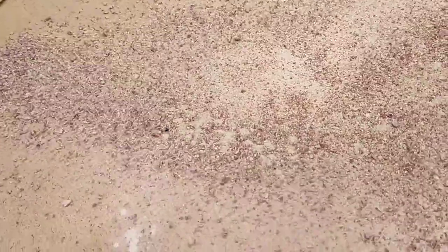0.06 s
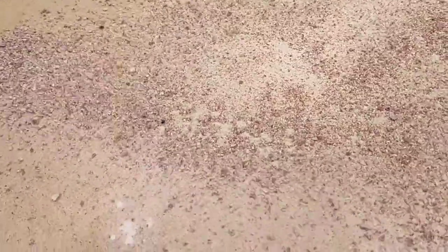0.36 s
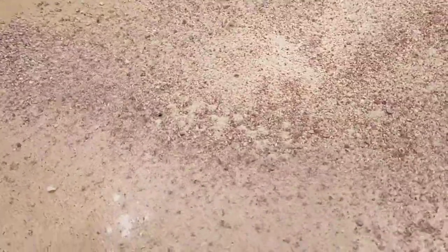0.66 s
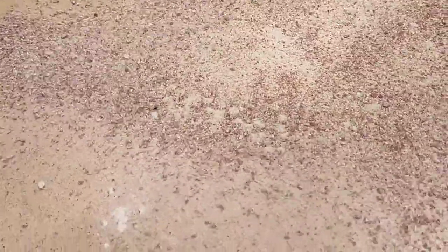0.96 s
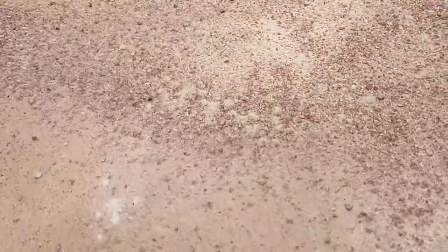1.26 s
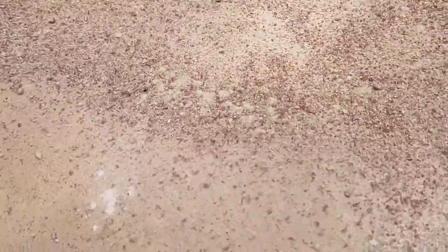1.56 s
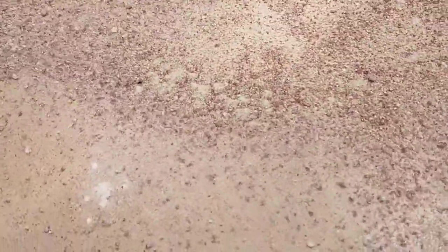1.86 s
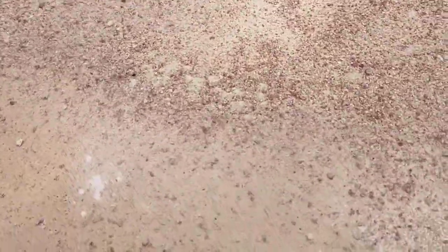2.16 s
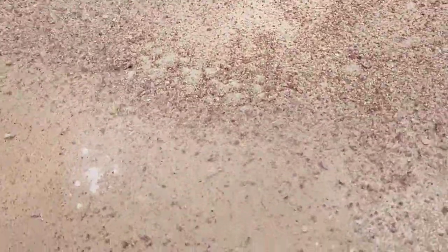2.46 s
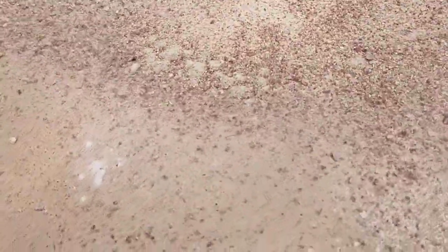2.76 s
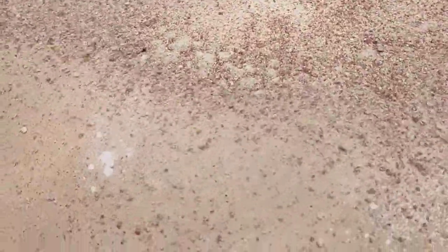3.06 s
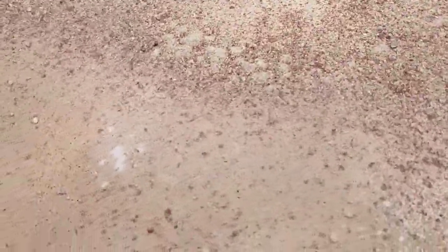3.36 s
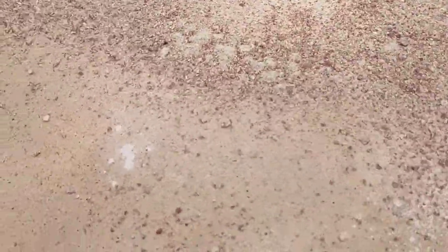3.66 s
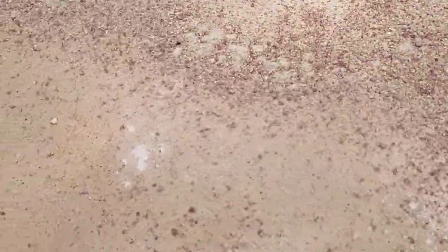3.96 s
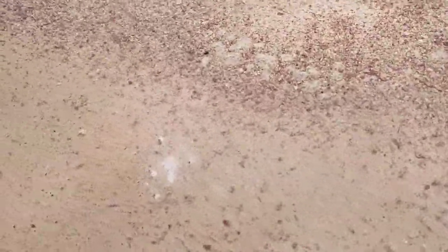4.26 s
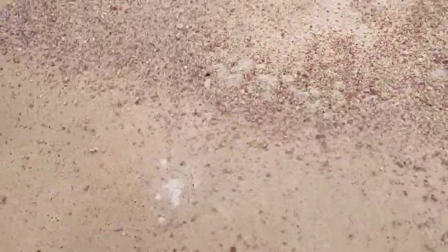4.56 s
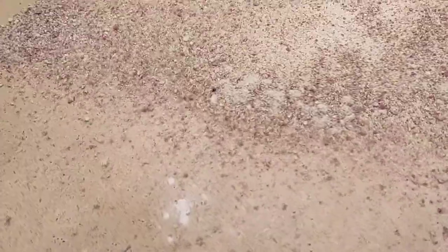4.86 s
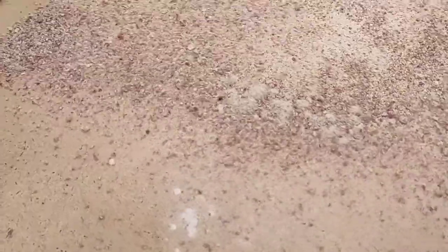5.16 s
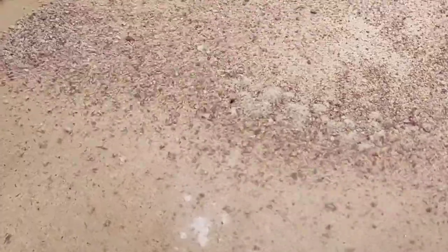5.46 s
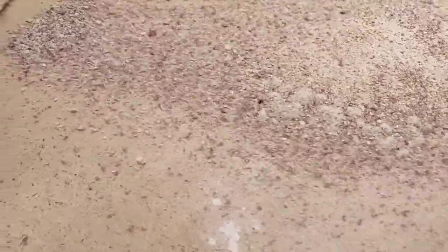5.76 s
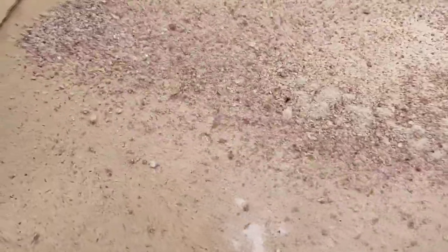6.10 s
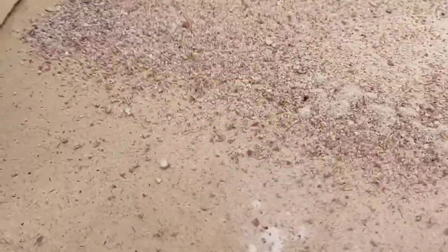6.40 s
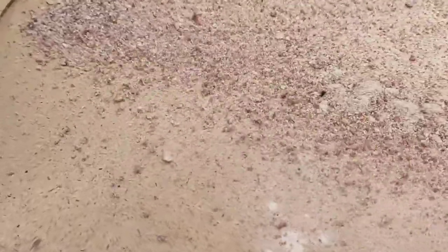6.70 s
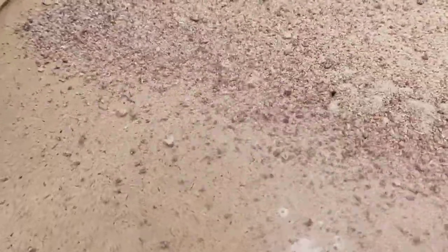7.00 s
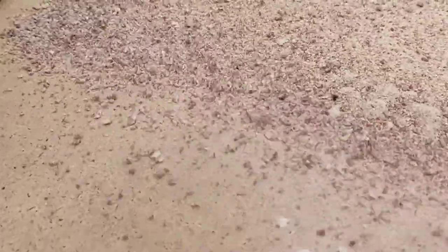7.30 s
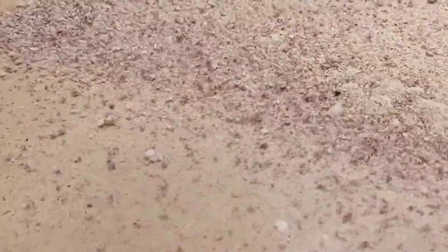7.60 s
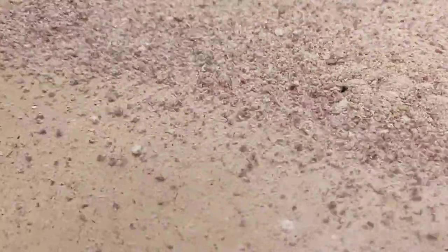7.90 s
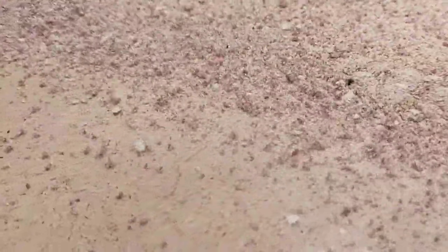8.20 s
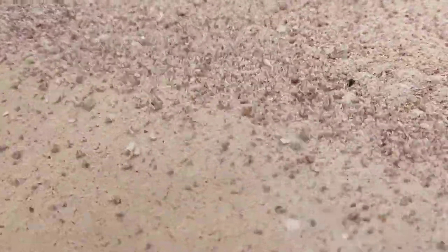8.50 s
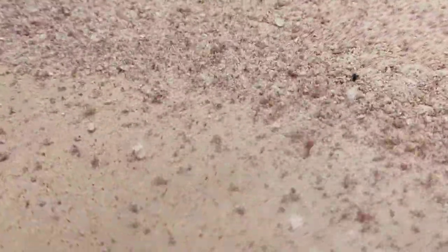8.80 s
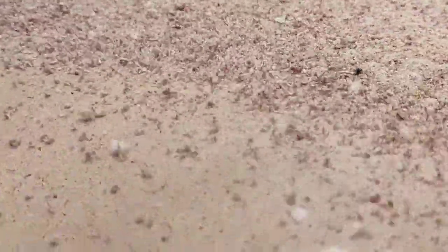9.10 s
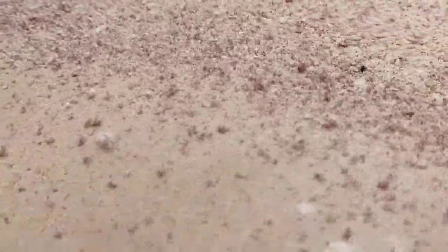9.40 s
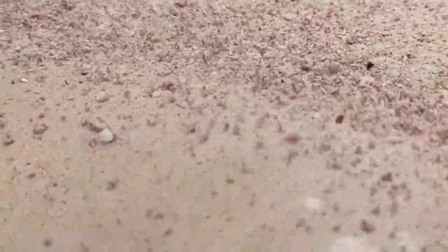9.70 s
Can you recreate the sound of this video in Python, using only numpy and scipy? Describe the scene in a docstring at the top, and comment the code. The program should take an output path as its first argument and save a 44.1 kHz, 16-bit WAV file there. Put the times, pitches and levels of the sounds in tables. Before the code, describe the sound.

An electric shaker hums steadily under a tray, which throbs and rattles while sand hisses and crackles on it, growing gradually closer.

```python
"""A mains-driven shaker hums under a tray of sand, indoors and close to the microphone.
It pushes the tray 100 times a second while the tray rocks at about 43 Hz, so hum, rattle and knocks
throb in a near-repeating pattern that stumbles for the first second, then settles. Sand is thrown up
and lands on every stroke, and coarse grains crackle at each blow, over a dull rustle.
Mostly in the second half, the microphone moves nearer and comes over coarser sand."""
import sys
import numpy as np
from scipy import signal
from scipy.fft import rfft, irfft
from scipy.io import wavfile

SR = 44100
rng = np.random.default_rng(int(sys.argv[2]) if len(sys.argv) > 2 else 0)


def generate_wav(signal):
    """Clip the signal to [-1, 1] and save it as 16-bit WAV at the path in sys.argv[1]."""
    frames = np.transpose(np.atleast_2d(signal))
    scaled = np.clip(frames, -1, 1) * 32767
    pcm = np.round(scaled).astype(np.int16)
    wavfile.write(sys.argv[1], SR, pcm)


N = 434385
TIME = np.arange(N) / SR
STROKE_HZ, STROKE_START = 99.996, .367  # the shaker's push; start in cycles
ROCK_HZ, ROCK_START = 42.605, -.25  # the tray's settled rocking; start in cycles

# The rocking, a little faster during the stumble. Each row: time in seconds, rate in Hz.
ROCK_RATE = [(0, 43.25), (.5, 43.45), (1.1, 43), (1.45, 42.61), (3, 42.6), (4.3, 42.545), (5.3, 42.605),
             (6.8, 42.625), (9.85, 42.6)]
# The hum, one row per stroke harmonic from the first up.
# Each row: base levels in dB of the lines -4 to 4 rocking rates away from that harmonic.
HUM_LEVELS = [(-82, -69, -70, -60, -15.2, -62, -53, -63, -72),
              (-74, -66, -62, -44.5, -27.9, -41.3, -44.5, -51, -50),
              (-67, -61, -47, -41, -28.4, -30.5, -37.5, -52, -51),
              (-71, -65, -39, -30.5, -47.5, -47, -43, -45, -55),
              (-60, -51, -48, -38.3, -35.8, -43.5, -53, -56, -53.5),
              (-67, -50, -41.5, -40.3, -50, -41.3, -48.5, -59, -60),
              (-59, -53.5, -47, -43.8, -51, -61, -62, -64, -60)]
# What hum and rattle gain as the microphone moves in. Each row: frequency in Hz, gain in dB.
CLOSE_UP_EQ = [(100, 3.5), (200, 5), (290, 2), (340, 2.5), (460, 7.5), (650, 4.5), (850, 6), (1010, 8),
               (1120, 4), (1400, 0.5)]
# How stumbling reshapes the hum. Each row: frequency in Hz, gain in dB.
STUMBLE_EQ = [(100, 0.5), (200, -2), (300, 2.5), (340, 0), (360, -13), (390, 0), (455, -9), (500, -0.5),
              (640, -18.5)]
# The rattle, one row per stroke harmonic above those of the hum.
# Each row: base levels in dB of the lines -5 to 5 rocking rates away from that harmonic.
RATTLE_LEVELS = [(-68, -55, -54, -57, -56, -61, -54, -59, -63, -65, -66),
                 (-70, -62, -59, -58, -53, -61, -65, -63, -67, -63, -59),
                 (-65, -62, -59, -63, -59, -65, -60, -68, -64, -64, -65),
                 (-65, -64, -70, -54, -61, -63, -64, -66, -68, -68, -67),
                 (-63, -70, -65, -60, -66, -64, -65, -68, -71, -74, -75),
                 (-63, -61, -70, -60, -69, -63, -70, -72, -73, -74, -67),
                 (-68, -68, -67, -70, -71, -75, -69, -74, -69, -74, -77)]
# Where the tray hits its support. Each row: tilt of the hardest blow and reach around it, both in
# rocking cycles, place in the stroke in cycles, drift in strokes per rock, strength in dB.
TRAY_CONTACTS = [(.23, .14, .79, .15, 5), (.93, .2, .70, .2, 0), (.5, .1, .65, -.5, 3.5),
                 (.71, .13, .69, .1, 2), (.65, .15, .86, .1, 2), (.8, .14, 1.08, 0, 0)]
# Tone of the tray's ring and thud, the grains' crackle, the two sands and the background rustle.
# Each row: frequency in Hz, relative level in dB.
KNOCK_EQ = [(250, 36), (480, -54), (640, 20), (800, 25), (1000, 11), (1150, 26.5), (1330, -8.5), (1500, 2),
            (1750, -15), (2400, -13), (3800, -43)]
THUD_EQ = [(110, -38.5), (180, -13), (260, -17.5), (330, 1), (385, -1), (430, -18), (510, -10),
           (620, -15.5), (800, -28), (1100, -42), (1600, -86)]
CRACKLE_EQ = [(1400, -4), (1750, -1.5), (2200, 1.5), (3000, -4), (4200, -9.5), (6000, -2.5), (8000, 1),
              (10000, -23)]
FINE_SAND_EQ = [(820, 10), (1400, -1.5), (1760, -3.5), (1900, 1), (2320, -3), (2640, -3), (3350, -11),
                (3700, -7), (4510, -11), (6520, 0), (8190, 5.5), (8870, 2), (10200, -11), (14400, -15.5),
                (15000, -23)]
COARSE_SAND_EQ = [(820, -10), (1400, -2), (1520, 5.5), (1760, 0.5), (2170, 5.5), (3970, -8.5), (6710, 1.5),
                  (8440, 5), (8950, 2.5), (9890, -9.5), (11900, -9), (14400, -13), (15000, -20)]
RUSTLE_EQ = [(15, 4), (45, 1), (120, 2.5), (220, -1), (340, 1), (500, -2), (700, -8), (1100, -13),
             (1600, -22), (3000, -40)]
# Balance of the two microphone ports. Each row: frequency in Hz, left minus right in dB.
PORT_BALANCE = [(60, -4), (80, 3.5), (110, 6.5), (140, 0), (190, 1), (260, 9), (340, 3), (440, 4),
                (540, 3.5), (640, -1), (820, 0), (1100, 0), (1470, -2), (1960, -4), (2620, 0.5), (3510, 1),
                (4690, 1), (6270, -1.5), (8380, 8.5), (11200, 11.5), (15000, -3.5)]
# Phase between the ports. Each row: frequency in Hz, lead of the left port in radians.
PORT_PHASE = [(280, 0), (600, -.55), (1100, -.7), (2000, 0)]


def hum(stroke, rock, stumble, near, side_stumble_db=2.5):
    """The shaker drones on harmonics of its stroke; the rocking splits each into side lines."""
    nearer = near - near.mean()
    side_lift = gain_of(side_stumble_db * stumble)
    sides = {m: phasor(m * rock) * (side_lift if m else 1) for m in range(-4, 5)}
    out = np.zeros(N)
    for harmonic, levels in enumerate(HUM_LEVELS, 1):
        push = phasor(harmonic * stroke)
        for (m, side), db in zip(sides.items(), levels):
            hz = abs(harmonic * STROKE_HZ + m * ROCK_HZ)
            # harmonics share one delay; side lines follow the tilt and flip below the main resonance
            phase = .3 + .79 * m + .4 * (m > 1) + .5 * (hz < 292) if m else .25 - .35 * harmonic
            level = gain_of(db + curve_at(CLOSE_UP_EQ, hz) * nearer + curve_at(STUMBLE_EQ, hz) * stumble)
            out += np.sqrt(2) * level * (push * side * phasor(phase)).real
    return out


def rattle(stroke, rock, near, swell_hz=1015, swell_width_hz=55, spread_cycles=.11):
    """The tray's pitched rattle pulses with the rocking; up close, one resonance slowly swells."""
    sides = {m: phasor(m * (rock - .05) + m * m / 11) for m in range(-5, 6)}
    nearer = near - near.mean()
    # seven times the rocking rate nearly meets the stroke's third harmonic: a slow beat
    swell_db = 4 * near ** .3 * (np.cos(2 * np.pi * (3 * stroke - 7 * rock - .08)) - .1)
    loose_stroke = stroke - .89 + .0015 * waver(25)  # late in the stroke, with a little slop
    out = np.zeros((2, N))
    for harmonic, levels in enumerate(RATTLE_LEVELS, len(HUM_LEVELS) + 1):
        push = phasor(harmonic * loose_stroke)
        for (m, side), db in zip(sides.items(), levels):
            hz = harmonic * STROKE_HZ + m * ROCK_HZ
            resonance = np.exp(-((hz - swell_hz) / swell_width_hz) ** 2)
            level = gain_of(db + curve_at(CLOSE_UP_EQ, hz) * nearer + resonance * swell_db)
            ear_angle = phasor(spread_cycles * rng.standard_normal())
            smear = phasor(spread_cycles * rng.standard_normal())  # the tray's modes smear the blows
            line = push * side * level * smear
            out += (line * ear_angle).real, (line / ear_angle).real
    flutter_db = .15 + .07 * waver(51)
    return np.sqrt(2) * out * gain_of(flutter_db)


def blows(rock, stumble, jitter_ms=.039, stumble_ms=.4, chance_db=2):
    """The tray strikes its support each stroke; the tilt decides which edge hits, when and how hard."""
    strikes = np.zeros(N)
    for hardest, reach, place, drift, db in TRAY_CONTACTS:
        at = stroke_times(place)
        tilt = (np.interp(at, TIME, rock) - hardest + .5) % 1 - .5
        slop_ms = jitter_ms + stumble_ms * np.interp(at, TIME, stumble)
        late, hard = rng.uniform(-.65, 1, (len(at), 2)).T
        at = at + drift * tilt / STROKE_HZ + slop_ms * late / 1000
        force = gain_of(db + chance_db * hard) * np.exp(-(tilt / reach) ** 2)
        strikes += clicks(at, force * (at < TIME[-1]))
    return strikes


def knocks(strikes, stumble, level_db, thud_db=-27.5):
    """The blows ring the tray; while it stumbles, uneven blows make its whole body thud."""
    ring = reflections(colour(strikes, KNOCK_EQ), t60_s=.44, wet_db=-6)
    at = stroke_times(.92)[:-1]
    thuds = colour(clicks(at, rng.choice([-1, 1], len(at))), THUD_EQ)
    return gain_of(level_db) * unit_rms(ring) + gain_of(thud_db) * stumble * unit_rms(thuds)


def sand(stroke, rock, coarseness, level_db, grains_per_s=12000, size_spread_db=3, bunching_db=2):
    """Grains land in a hissing shower on each stroke; a few are larger than the rest."""
    landing = 2 * np.pi * (stroke - .78)
    shower_db = bunching_db * (np.cos(landing) + .53 * np.cos(2 * landing + 1.7))
    # the throw is strongest when stroke and rocking line up
    shower_db += .23 * np.cos(landing - 2 * np.pi * rock) + .5 * np.cos(landing - 4 * np.pi * rock)
    shower_db += .78 * waver(60)
    lands = rng.random((2, N)) < grains_per_s / SR
    size = gain_of(size_spread_db * np.minimum(rng.exponential(1, (2, N)), 6))
    grains = lands * size * rng.choice([-1, 1], (2, N)) * gain_of(shower_db)
    room_wash = gain_of(-1) * rng.standard_normal((2, N))
    grains = unit_rms(grains) + room_wash
    fine = unit_rms(colour(grains, FINE_SAND_EQ))
    coarse = unit_rms(colour(grains * rng.choice([-1, 1], (2, N)), COARSE_SAND_EQ))
    hiss = np.sqrt(1 - coarseness) * fine + np.sqrt(coarseness) * coarse
    return gain_of(level_db) * unit_rms(hiss)


def grain_crackle(strikes, level_db, decay_s=.0012):
    """Each blow jolts the coarse grains, which answer with a very short crackle."""
    bursts = signal.lfilter([1], [1, -np.exp(-1 / (decay_s * SR))], strikes)
    crackle = colour(bursts * rng.standard_normal((2, N)), CRACKLE_EQ)
    return gain_of(level_db) * unit_rms(reflections(crackle, t60_s=.19, wet_db=-5))


def bed_rustle(level_db):
    """The shaken bed of sand and the room lay a dull rustle under everything."""
    noise = rng.standard_normal(N) + rng.standard_normal((2, N))  # centre plus width
    return gain_of(level_db) * unit_rms(colour(noise, RUSTLE_EQ))


def reflections(x, t60_s, wet_db):
    """Tray and room add a dense tail, different at each ear."""
    t = TIME[:SR // 3]
    tail = rng.standard_normal((2, len(t))) * gain_of(-60 * t / t60_s)
    tail /= np.linalg.norm(tail, axis=1, keepdims=True)
    return x + gain_of(wet_db) * signal.oaconvolve(x, tail, axes=1)[:, :N]


def gain_of(db):
    """Decibels to a gain."""
    return 10 ** (np.asarray(db) / 20)


def unit_rms(x):
    """Scales to rms 1."""
    return x / np.sqrt(np.mean(x ** 2) + 1e-20)


def phasor(cycles):
    """A point on the unit circle, turned by the given phase."""
    return np.exp(2j * np.pi * cycles)


def curve_at(curve, hz):
    """Reads a curve on a log-frequency axis."""
    points_hz, values = np.transpose(curve)
    return np.interp(np.log(hz + 1), np.log(points_hz + 1), values)


def colour(x, eq, size=4096):
    """Minimum-phase EQ: a click rings after, never before."""
    hz = abs(np.fft.fftfreq(size, 1 / SR))
    low_cut_db = 24 * np.minimum(np.log2((hz + 1) / eq[0][0]), 0)
    log_gain = np.log(gain_of(np.maximum(curve_at(eq, hz) + low_cut_db, -100)))
    taps = np.fft.ifft(np.exp(np.conj(signal.hilbert(log_gain)))).real[:size // 2]
    return signal.oaconvolve(np.atleast_2d(x), taps[None], axes=1)[:, :N]


def waver(rate_hz):
    """A random wobble of rms 1, rolling off above the given rate."""
    hz = np.fft.rfftfreq(N, 1 / SR)
    return unit_rms(irfft(rfft(rng.standard_normal(N)) * np.exp(-(hz / rate_hz) ** 2), N))


def clicks(at_s, size):
    """Impulses, each shared between its two nearest samples."""
    place = np.clip(at_s * SR, 0, N - 2)
    whole, part = place.astype(int), place % 1
    return np.bincount(whole, size * (1 - part), N) + np.bincount(whole + 1, size * part, N)


def stroke_times(place):
    """The moment in seconds at which each stroke reaches the given place in its cycle."""
    return (np.arange(int(N / SR * STROKE_HZ) + 1) - STROKE_START + place) / STROKE_HZ


def fade(middle_s, length_s):
    """A smooth fade from 0 to 1."""
    return .5 + .5 * np.sin(np.pi * np.clip((TIME - middle_s) / length_s, -.5, .5))


def scene():
    """Stroke and rocking drive tray and sand; the tray settles, then the microphone moves in."""
    stumble = 1 - .947 * fade(middle_s=.78, length_s=.9)  # a trace never settles
    near = fade(middle_s=6.6, length_s=7.1)
    over_coarse = fade(middle_s=7.23, length_s=3)
    over_spray = fade(middle_s=8.7, length_s=1.2)  # right above the leaping grains
    stroke = STROKE_START + STROKE_HZ * TIME
    rock = ROCK_START + np.cumsum(np.interp(TIME, *np.transpose(ROCK_RATE))) / SR
    rock += (.0012 + .015 * stumble) * waver(14)
    strikes = blows(rock, stumble)
    tray = hum(stroke, rock, stumble, near) + rattle(stroke, rock, near ** 1.3)  # rattle grows late
    tray += knocks(strikes, stumble, level_db=-56 + 7.5 * near + 2 * stumble)
    crackle = grain_crackle(strikes, level_db=-56.5 + 10.5 * near ** .65 + 4 * stumble)  # grows early
    shower = sand(stroke, rock, over_coarse, level_db=-43 + 2.5 * over_spray)
    return tray + crackle + shower + bed_rustle(level_db=-48 + 4.5 * near)


def record(dry, high_cut_hz=15050):
    """The two microphone ports differ in tone and phase, and the very top is cut off."""
    hz = np.fft.rfftfreq(2048, 1 / SR)
    left_right = [.5, -.5]
    balance = gain_of(np.outer(left_right, curve_at(PORT_BALANCE, hz)))
    balance /= np.sqrt(np.mean(balance ** 2, axis=0))
    phase = np.exp(1j * np.outer(left_right, curve_at(PORT_PHASE, hz)))
    taps = np.fft.fftshift(irfft(balance * phase * (hz < high_cut_hz)), axes=1)[:, 1:]
    return signal.oaconvolve(dry, taps * np.hanning(taps.shape[1]), "same", axes=1)


dry = scene()
out = record(dry)
generate_wav(out)
```